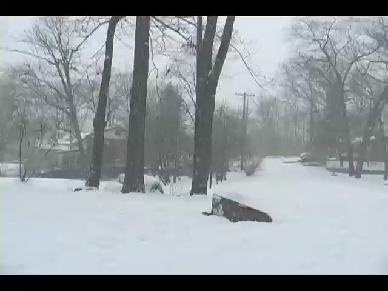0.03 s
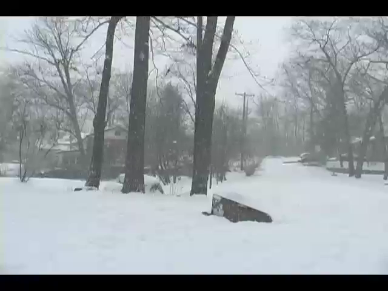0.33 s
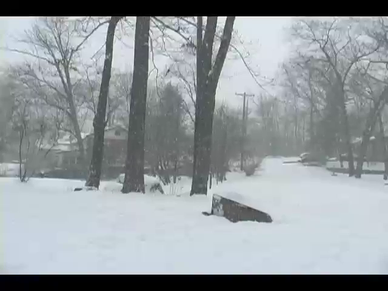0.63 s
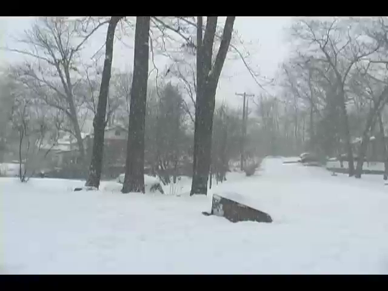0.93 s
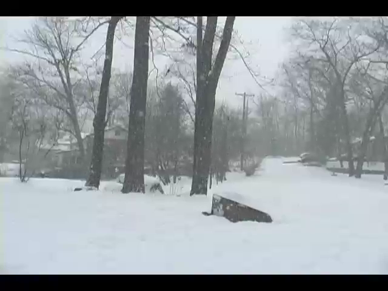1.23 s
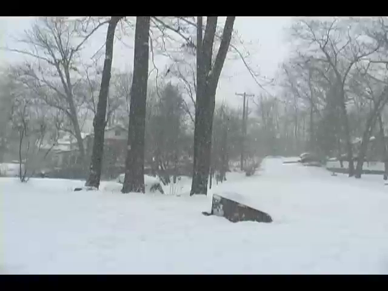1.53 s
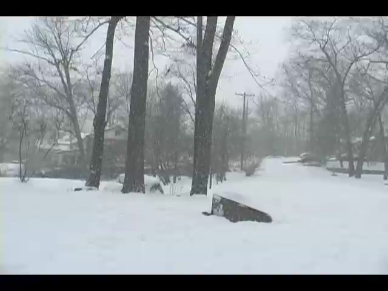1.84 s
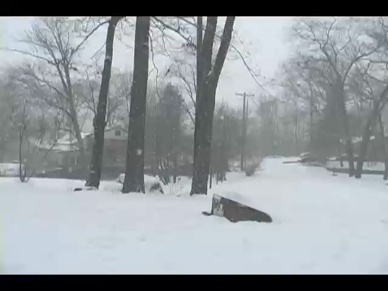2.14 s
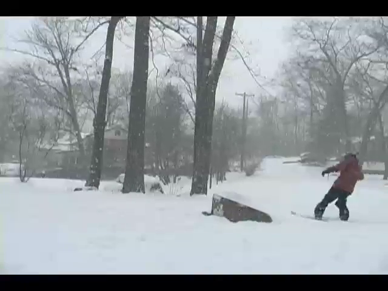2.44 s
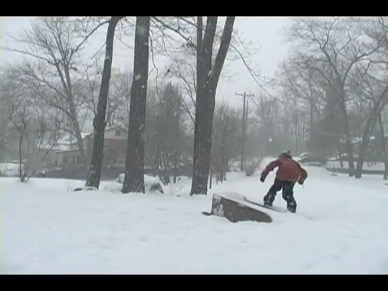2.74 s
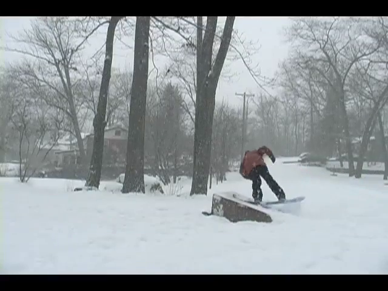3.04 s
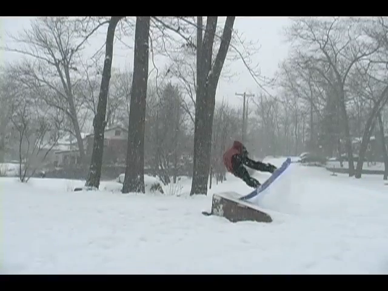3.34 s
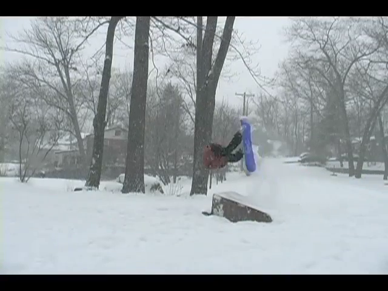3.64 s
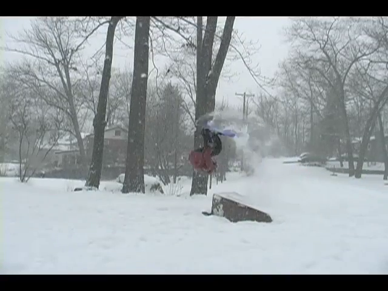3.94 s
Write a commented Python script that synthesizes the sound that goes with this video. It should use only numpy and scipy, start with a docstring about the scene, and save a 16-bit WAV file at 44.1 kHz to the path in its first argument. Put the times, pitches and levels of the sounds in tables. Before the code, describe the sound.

Snowboard scraping up a metal box with sharp knocks, after a low hum and snowflake ticks.

```python
"""A low motor hum and icy little ticks: a camera stands in falling snow, flakes tapping its housing,
while a snowboard hisses closer. Then everything drops into slow motion and turns dull. The board
scrapes up a snow-covered metal box among sharp knocks, wind rumbles on the microphone, and at take-off
the tail digs in with a thud and throws snow."""
import sys
import numpy as np
from scipy.fft import rfft, irfft, next_fast_len
from scipy.io import wavfile
from scipy.ndimage import uniform_filter1d, map_coordinates

SR = 44100
rng = np.random.default_rng(int(sys.argv[2]) if len(sys.argv) > 2 else 0)


def put_to_file(sound):
    """Save the sound as 16-bit audio at rate SR, in the file named by the first command-line argument."""
    columns = np.atleast_2d(sound).T  # one column per channel
    safe = np.clip(columns, -1, 1)
    whole_steps = np.round(safe * 32767)
    wavfile.write(sys.argv[1], SR, whole_steps.astype(np.int16))


N = 176400

START_S, SLOW_MOTION_S = .085, 2.76
SLOW_TOP_HZ, CAMERA_TOP_HZ = 8400, 15900

# The motor's tones. Each row: pitch in Hz, rms level in dB, level waver in dB.
MOTOR_TONES = [(70.2, -42.5, 1.36), (149.6, -54, 1.2)]
# Still air and microphone hiss. Each row: frequency in Hz, relative level in dB.
AIR_COLOUR = [(20, 0.5), (65, 7.5), (120, 2), (260, -8), (480, -10.5), (850, -7), (1700, -13.5),
              (3500, -14.5), (5000, -29.5), (14000, -31.5)]
# The patter of the finest flakes. Each row: frequency in Hz, relative level in dB.
PATTER_COLOUR = [(300, -8), (3000, 4), (7100, 3), (7900, 11.5), (8900, 5), (12000, 4), (16000, -30)]
# Flakes and small clumps hitting the housing. Each row: start in seconds, level in dB,
# band centre in Hz, time to fade 60 dB in seconds, band width in octaves.
FLAKE_HITS = [(.191, -41, 3000, 0.0053, 1.2), (.437, -42.5, 8000, 0.048, 1.8),
              (.4385, -39, 230, 0.053, 0.59), (.446, -39, 5950, 0.011, .4), (.5663, -36, 1160, 0.0072, 1.1),
              (.567, -42.5, 10300, 0.013, 1.2), (.703, -44, 11500, .0018, 0.81),
              (.8025, -39, 5960, .0054, 0.47), (.8095, -34, 560, 0.0048, 2.2),
              (1.280, -38.5, 6500, .02, 1.55), (1.295, -41.5, 2200, 0.0077, 1.4),
              (1.3735, -42, 10000, 0.0029, 1.5), (1.835, -45.5, 12000, 0.02, 1.1),
              (2.1257, -42.5, 13000, .0021, 1), (2.149, -34, 170, 0.031, 0.45),
              (2.292, -36, 8900, 0.0074, 0.97), (2.355, -42, 10000, 0.025, 1.4),
              (2.669, -38.5, 680, .011, 0.78), (2.727, -38.5, 3500, 0.018, 2)]
# The housing's tone when tapped. Each row: frequency in Hz, relative gain in dB.
HOUSING_BODY = [(100, -16), (230, 13), (420, 6.5), (850, 13), (1900, 3), (6800, -11), (12000, -8),
                (16000, -25)]
# The swell of the nearing board. Each row: time in seconds, level in dB.
APPROACH_FADER = [(1.5, -57), (2.36, -53.5), (2.47, -49), (2.59, -51), (2.72, -46.5)]
# The board's hiss on soft snow. Each row: frequency in Hz, relative level in dB.
GLIDE_COLOUR = [(200, -1.5), (3500, 3), (5800, 4), (9000, -3.5), (12000, -6), (13500, -13)]
# The board's pressure on the box, heard as loudness. Each row: time in seconds, level in dB.
SCRAPE_FADER = [(2.76, -46.5), (2.812, -46), (2.83, -40.5), (2.90, -40), (2.935, -39.5), (3.05, -40.5),
                (3.23, -44), (3.31, -40.5), (3.39, -32), (3.438, -26), (3.462, -33.5), (3.52, -33.5),
                (3.57, -42.5), (3.72, -43), (3.79, -39.5), (3.82, -55), (3.95, -45.5), (4.0, -37.5)]
# Snow crushed under the board. Each row: frequency in Hz, relative level in dB.
GRIT_COLOUR = [(60, -38), (200, -5), (600, -1), (900, 2.5), (1400, -0.5), (2600, -2), (3500, -13),
               (4500, -11.5), (5700, -24.5), (8500, -30.5)]
# The ring of board and box. Each row: centre in Hz, width in Hz, relative gain in dB.
BOARD_BOX_MODES = [(510, 35, -4), (758, 26, -1), (972, 43, -1), (1300, 150, -7), (1580, 85, -0.5),
                   (1874, 120, 0.5), (2210, 130, 0.5)]
# Gusts on the microphone. Each row: time in seconds, level in dB.
WIND_FADER = [(2.72, -62), (2.80, -42.5), (2.86, -34.5), (3.1, -40), (3.38, -37), (3.47, -29.5),
              (3.59, -32.5), (3.67, -33.5), (3.77, -34.5), (3.84, -40.5)]
# The wind's deep rumble. Each row: frequency in Hz, relative level in dB.
WIND_COLOUR = [(10, -23), (20, -5.5), (28, -1), (42, -8), (90, -16.5), (150, -31.5), (1500, -66.5)]
# The dull air bed in slow motion. Each row: frequency in Hz, relative level in dB.
SLOW_AIR_COLOUR = [(60, -14), (380, 0), (550, -10), (1500, -15.5), (4600, -19.5), (5700, -28),
                   (8500, -30.5)]
# Knocks and crunches in slow motion. Each row: start in seconds, level in dB,
# band centre in Hz, time to fade 60 dB in seconds, band width in octaves.
KNOCK_HITS = [(2.7812, -32.5, 2600, .009, .7), (2.819, -28.5, 1090, .03, 1.3),
              (2.8255, -23, 1100, .055, 1.1), (2.927, -32.5, 2000, .035, 1.6),
              (2.9976, -23, 1300, .014, 0.65), (3.0216, -28, 700, .012, 0.57),
              (3.0222, -35.5, 3150, .021, .2), (3.0595, -15.5, 2550, .028, 1.36),
              (3.0598, -16.5, 1510, 0.015, .27), (3.0915, -31, 1730, .014, 0.23),
              (3.1400, -28.5, 4060, .024, 0.96), (3.1435, -27.5, 1500, .024, 1.5),
              (3.398, -25, 1880, .04, 0.22), (3.4155, -25, 1760, .025, 1), (3.4225, -18, 1840, .06, 0.36),
              (3.437, -18.5, 1690, .045, 0.66), (3.617, -28.5, 430, .04, .9)]
# The tone all knocks share. Each row: frequency in Hz, relative gain in dB.
KNOCK_BODY = [(100, -21.5), (500, -2), (800, 1), (1650, -0.5), (2400, 0.5), (4100, -3.5), (5000, -7),
              (5700, -27), (8500, -32)]
# The tail digging in. Each row: start in seconds, hold in seconds, time to fade 60 dB in seconds,
# level in dB.
TAIL_BURSTS = [(3.402, 0.0087, 0.38, -29)]
# The low thud of the flexing board. Each row: frequency in Hz, relative level in dB.
FLEX_COLOUR = [(60, -24), (140, -15), (190, -3), (245, 6.5), (330, 0), (430, -4), (1000, -51)]
# Sprays of snow. Each row: start in seconds, hold in seconds, time to fade 60 dB in seconds,
# level in dB.
SPRAY_BURSTS = [(3.416, .035, .6, -31.5), (3.754, .04, .05, -40), (3.975, .03, .1, -43.5)]
# The fizz of flying powder. Each row: frequency in Hz, relative level in dB.
POWDER_COLOUR = [(1500, -25), (2300, 10), (3300, 0.5), (4200, 3), (5000, -2), (5700, -11), (8000, -10.5),
                 (9000, -24.5)]


def amp(db):
    """Decibels to gain."""
    return 10 ** (np.asarray(db) / 20)


def unit(x):
    """x at rms 1."""
    return x / np.sqrt(np.mean(x ** 2) + 1e-20)


def seconds():
    """The time of each sample."""
    return np.arange(N) / SR


def eq_gain(points, hz):
    """Gain of an EQ curve through (Hz, dB) points on a log axis."""
    point_hz, db = np.transpose(points)
    return amp(np.interp(np.log(hz + 1), np.log(point_hz + 1), db))


def fader(points):
    """A fader ride through (seconds, dB) points, as gain per sample."""
    return amp(np.interp(seconds(), *np.transpose(points)))


def wobble(per_s):
    """A smooth drift through per_s random values a second."""
    return map_coordinates(rng.standard_normal(4096), [seconds() * per_s], mode="wrap")


def filtered(x, response):
    """x through a filter whose gain is response(hz)."""
    size = next_fast_len(N + SR // 2)
    return irfft(rfft(x, size) * response(np.fft.rfftfreq(size, 1 / SR)), size)[:N]


def coloured(x, colour):
    """x through an EQ curve, at rms 1."""
    return unit(filtered(x, lambda hz: eq_gain(colour, hz)))


def noise(colour):
    """Coloured noise at rms 1."""
    return coloured(rng.standard_normal(N), colour)


def grains(per_s, spread_db):
    """Random tiny clicks of scattered size, at rms 1."""
    size = amp(spread_db * np.clip(rng.standard_normal(N), -2, 2)) * rng.choice([-1, 1], N)
    return unit(size * (rng.random(N) < per_s / SR))


def bursts(rows, attack_s):
    """Summed attack, hold and release envelopes."""
    t, envelope = seconds(), np.zeros(N)
    for start, hold, t60, db in rows:
        attack = np.clip((t - start) / attack_s, 0, 1)
        since_release = np.maximum(t - start - attack_s - hold, 0)
        envelope += attack * amp(db - 60 * since_release / t60)
    return envelope


def impacts(rows, body, lag_s, ring):
    """Blows on a plate: bending waves bring the treble first (1 kHz lags by lag_s), then a short ring."""
    size = 8192
    track = np.zeros(N + size)
    t, hz = np.arange(size) / SR, np.fft.rfftfreq(size, 1 / SR) + 1
    bending = np.exp(-4j * np.pi * lag_s * np.sqrt(1000 * hz))
    for start, db, centre_hz, t60, octaves in rows:
        blow = ring * rng.standard_normal(size) * amp(-60 * t / t60)
        blow[0] = 1  # the contact click
        band = np.exp(-.5 * (np.log2(hz / centre_hz) / octaves) ** 2)
        hit = irfft(rfft(blow) * bending * band * eq_gain(body, hz))
        punch = np.sqrt(np.sum(hit ** 2) / (.002 * SR))  # rms with all its energy packed into 2 ms
        track[round(start * SR):][:size] += amp(db) * hit / punch
    return track[:N]


def camera_hum():
    """The motor's wavering hum over a soft bed of air and microphone hiss."""
    hum = np.zeros(N)
    for hz, db, waver_db in MOTOR_TONES:
        peak = np.sqrt(2) * amp(db + waver_db * wobble(14))
        hum += peak * np.sin(2 * np.pi * hz * seconds() + 0.08 * wobble(8.34))
    return hum + amp(-48 + 0.88 * wobble(13.38)) * noise(AIR_COLOUR)


def snowfall():
    """Single flakes tick on the housing over a patter of finer ones, each crumbling briefly."""
    fizz = rng.standard_normal(N)
    landings = grains(per_s=98, spread_db=4)
    crumble = np.sqrt(np.abs(uniform_filter1d(landings ** 2, size=60)))
    patter = amp(-62.5) * coloured(fizz * crumble, PATTER_COLOUR)
    return patter + impacts(FLAKE_HITS, HOUSING_BODY, lag_s=0.000503, ring=0.59)


def board_approach():
    """The board hisses closer through soft snow."""
    return fader(APPROACH_FADER) * noise(GLIDE_COLOUR)


def board_scrape():
    """Crushed snow rubs under the chattering board; more pressure makes board and box ring more."""
    def resonance(hz):
        """The modes of board and box, summed in alternating polarity."""
        return sum((-1) ** k * amp(db) * 1j * hz * width / (centre ** 2 - hz ** 2 + 1j * hz * width)
                   for k, (centre, width, db) in enumerate(BOARD_BOX_MODES))

    crunch = grains(per_s=1500, spread_db=3)
    grit = coloured(crunch + 0.73 * rng.standard_normal(N), GRIT_COLOUR)
    taps = grains(per_s=1500, spread_db=2)
    ringing = unit(filtered(taps, lambda hz: resonance(hz) * eq_gain(GRIT_COLOUR, hz)))
    pressure = fader(SCRAPE_FADER)
    ring_share = pressure / (pressure + amp(-31.5))  # above this level, ring outweighs grit
    chatter = amp(2.13 * wobble(110))
    return pressure * chatter * (np.sqrt(1 - ring_share) * grit + np.sqrt(ring_share) * ringing)


def wind():
    """Gusts rumble on the microphone over the dull, slowed air."""
    rumble = noise(WIND_COLOUR)
    swell = np.sqrt(np.abs(uniform_filter1d(rumble ** 2, size=4410)) + 1e-6)
    gusts = fader(WIND_FADER) * rumble / swell  # evened out, so the fader shapes the gusts
    return gusts + amp(-46.5 + 1.1 * wobble(15)) * noise(SLOW_AIR_COLOUR)


def slow_knocks():
    """Sharp, quickly damped knocks and crunches, dulled by slow motion."""
    return impacts(KNOCK_HITS, KNOCK_BODY, lag_s=0.001572, ring=0.22)


def tail_thud():
    """The tail digs into the snow and the board flexes with a low thud."""
    return bursts(TAIL_BURSTS, attack_s=0.03) * noise(FLEX_COLOUR)


def snow_spray():
    """Flung powder fizzes in bursts of tiny grains."""
    powder = coloured(grains(per_s=4500, spread_db=2.5), POWDER_COLOUR)
    return bursts(SPRAY_BURSTS, attack_s=0.0023) * powder


def scene():
    """The run-up at normal speed crossfades quickly into the dull slow-motion jump."""
    t = seconds()
    crossfade = np.clip((t - SLOW_MOTION_S) / 0.0091 + .5, 0, 1)
    run_up = (camera_hum() + snowfall() + board_approach()) * (t > START_S) * (1 - crossfade)
    jump = crossfade * (board_scrape() + wind() + slow_knocks() + tail_thud() + snow_spray())
    rounded = jump / (1 + (jump / .33) ** 4) ** .25  # soft saturation on the loudest peaks
    dulled = filtered(rounded, lambda hz: 1 / np.sqrt(1 + (hz / SLOW_TOP_HZ) ** 80))
    return (run_up + dulled)[None]


def record(dry):
    """The camera cuts off the very top of the treble."""
    return filtered(dry[0], lambda hz: np.clip((CAMERA_TOP_HZ - hz) / 300 + .5, 0, 1))[None]


dry = scene()
out = record(dry)
put_to_file(out)
```